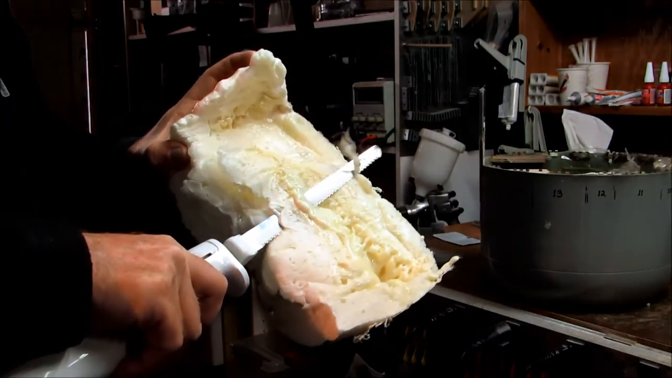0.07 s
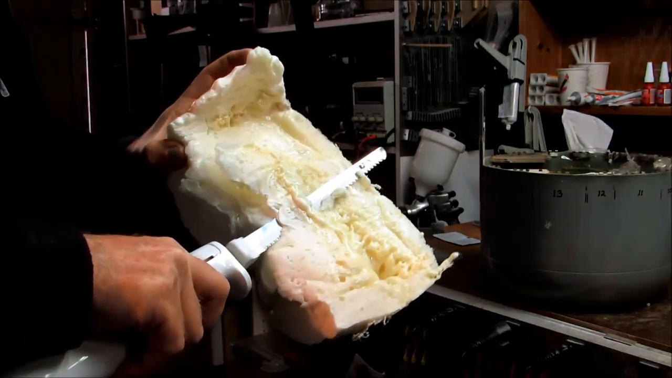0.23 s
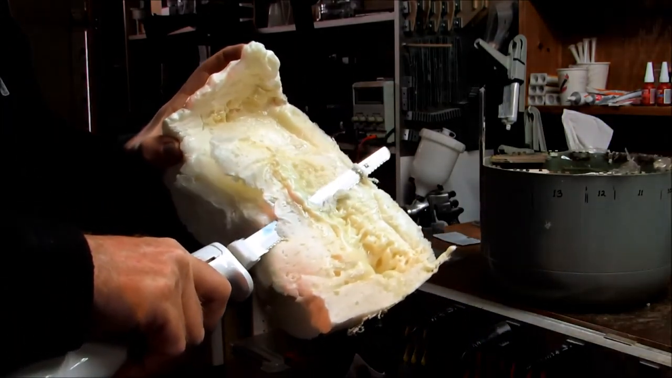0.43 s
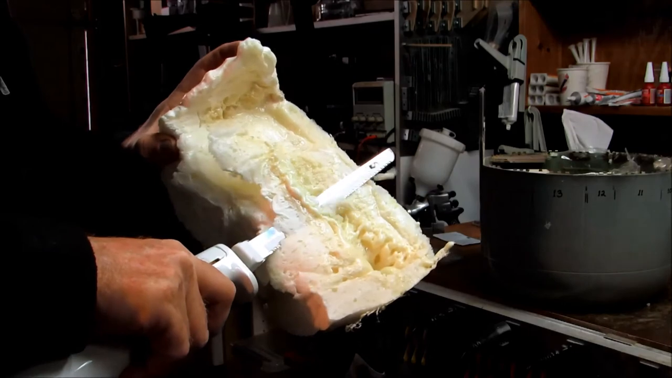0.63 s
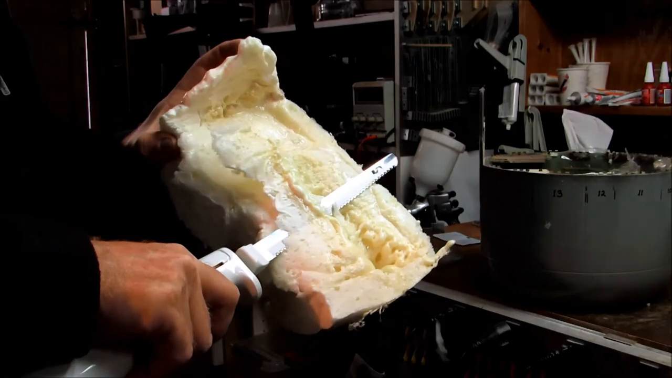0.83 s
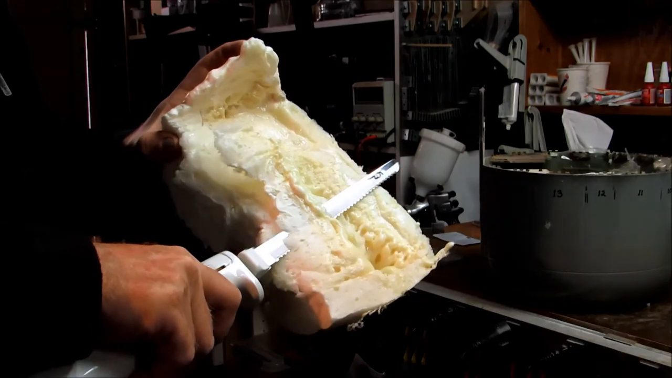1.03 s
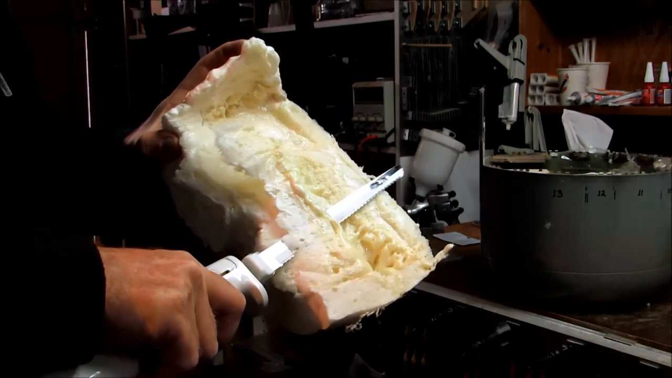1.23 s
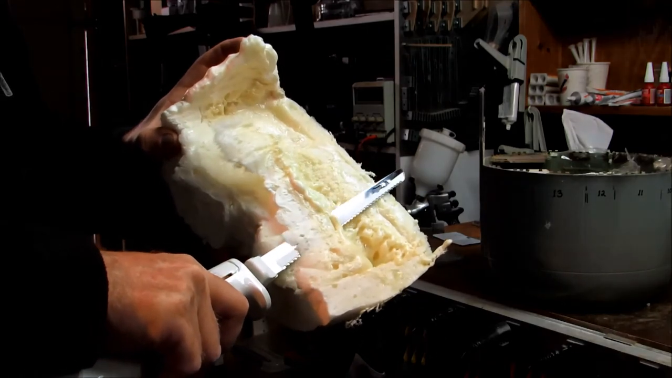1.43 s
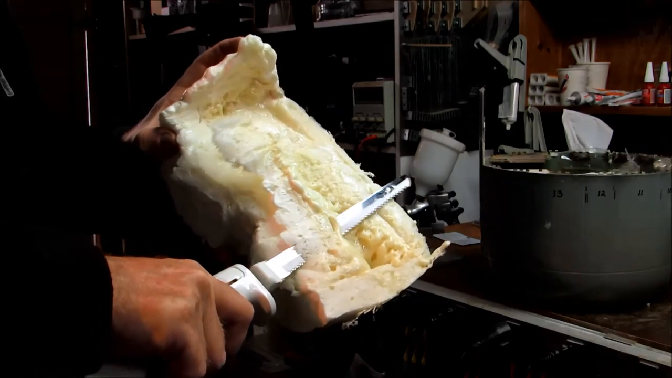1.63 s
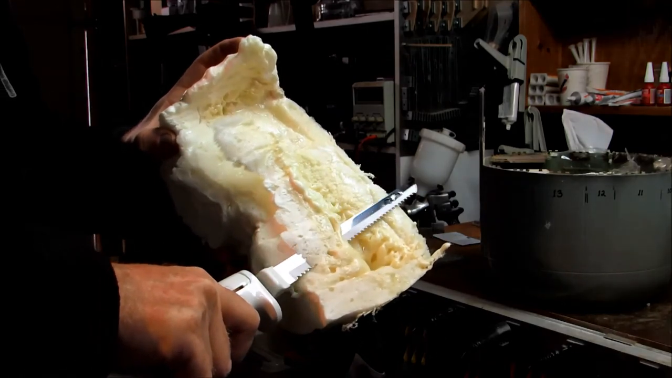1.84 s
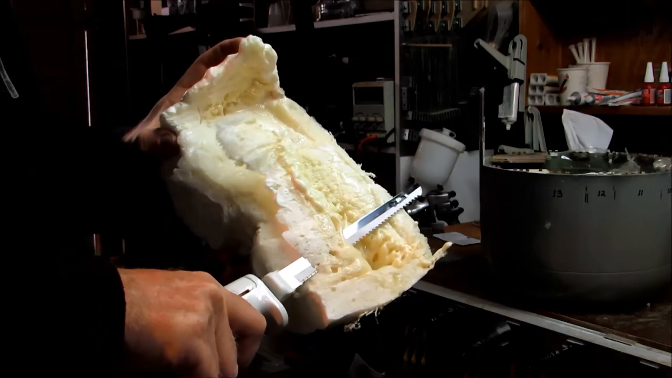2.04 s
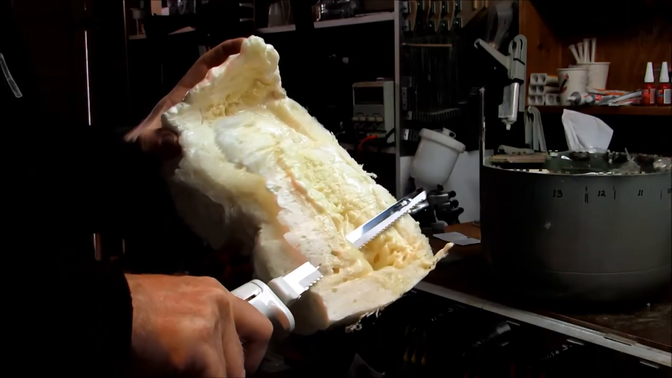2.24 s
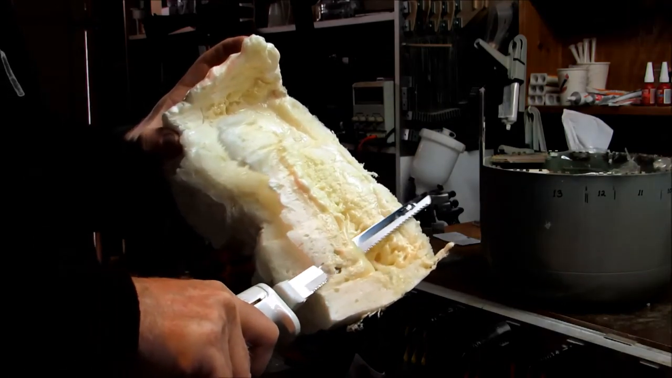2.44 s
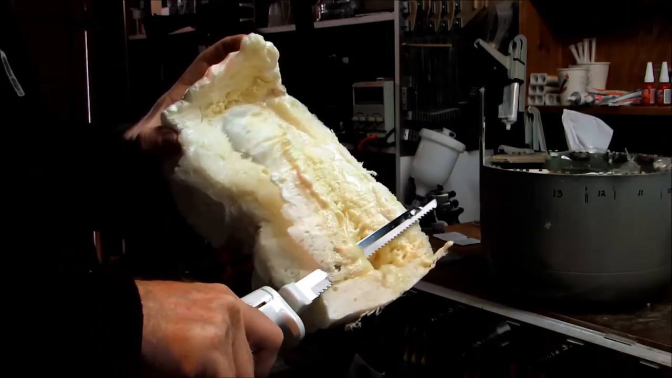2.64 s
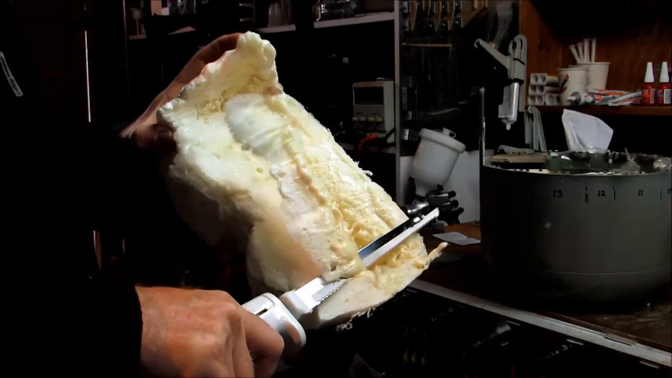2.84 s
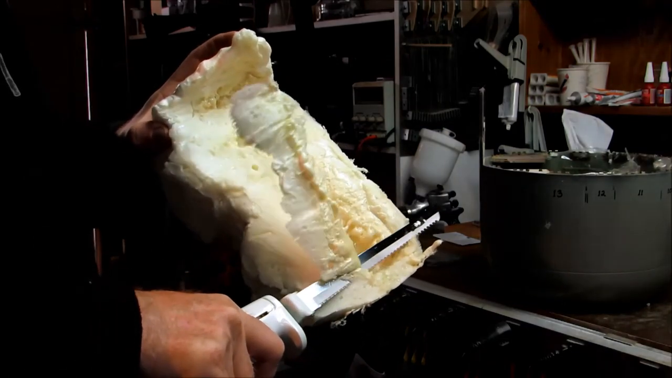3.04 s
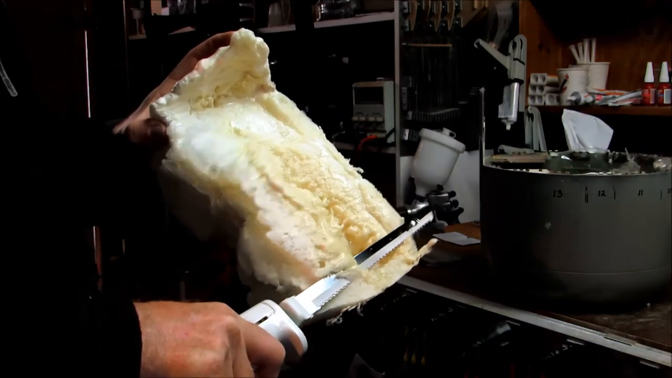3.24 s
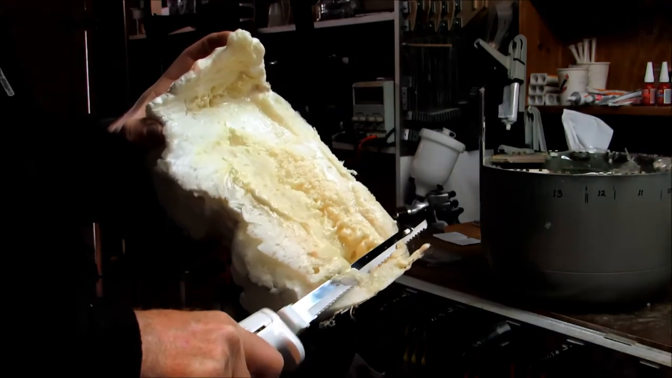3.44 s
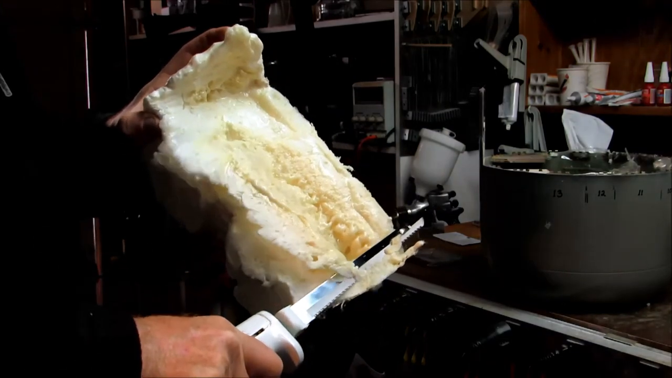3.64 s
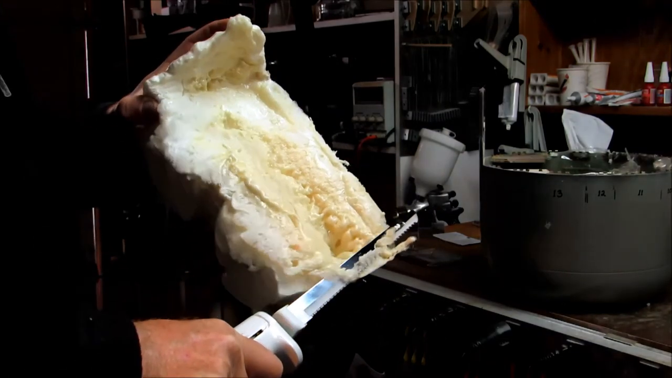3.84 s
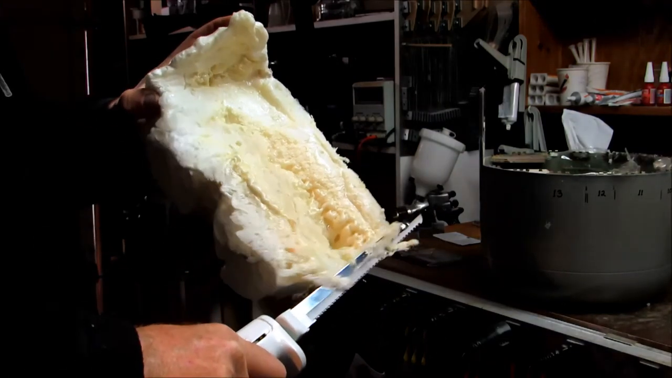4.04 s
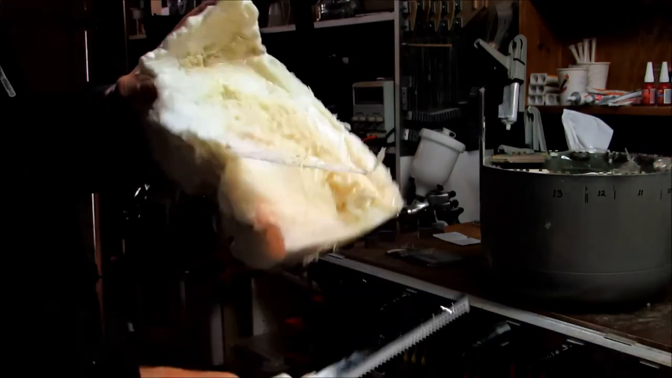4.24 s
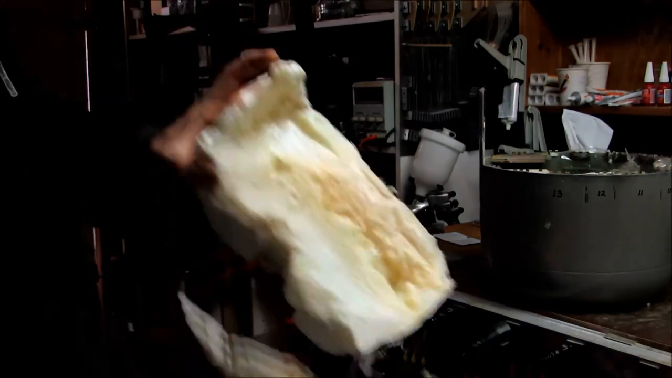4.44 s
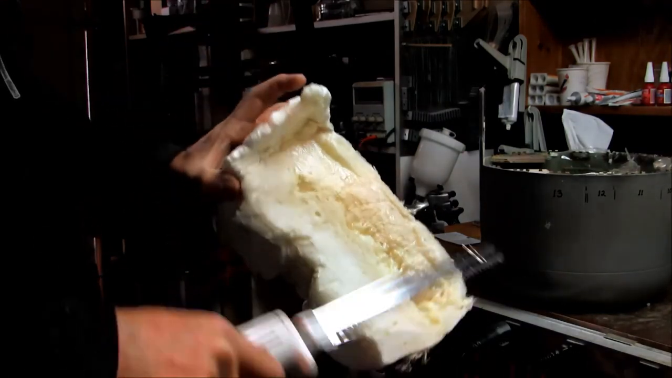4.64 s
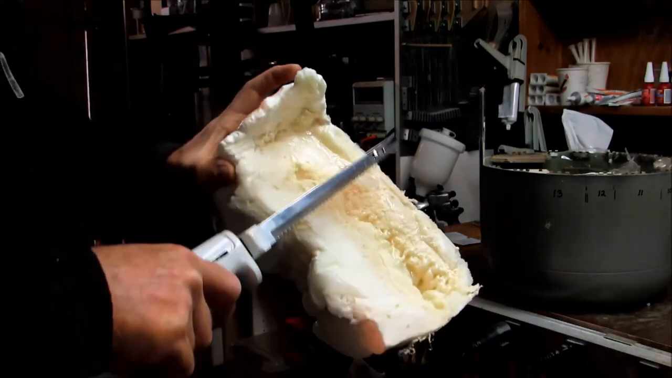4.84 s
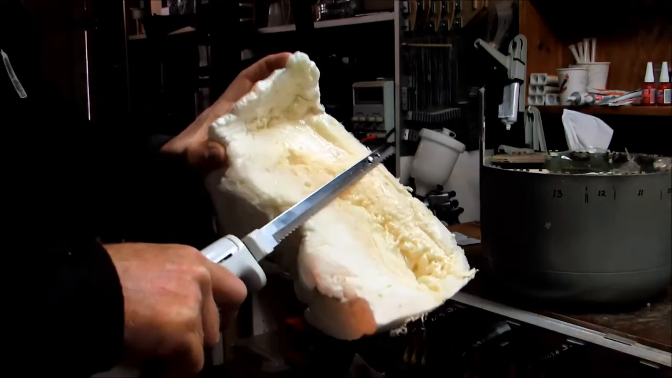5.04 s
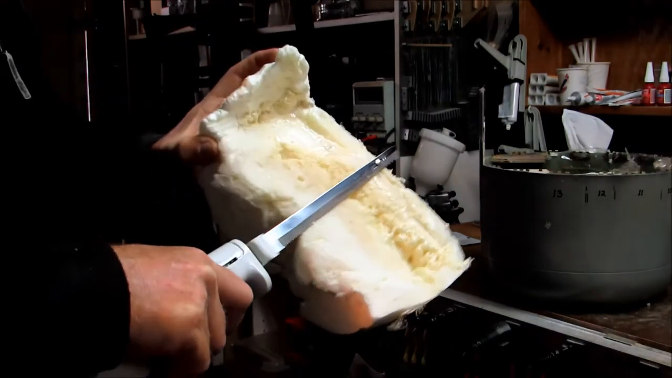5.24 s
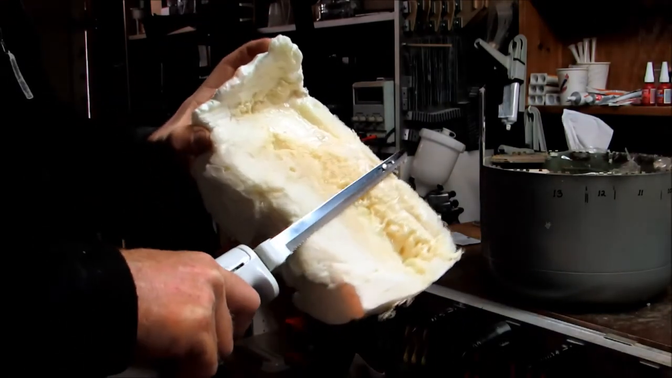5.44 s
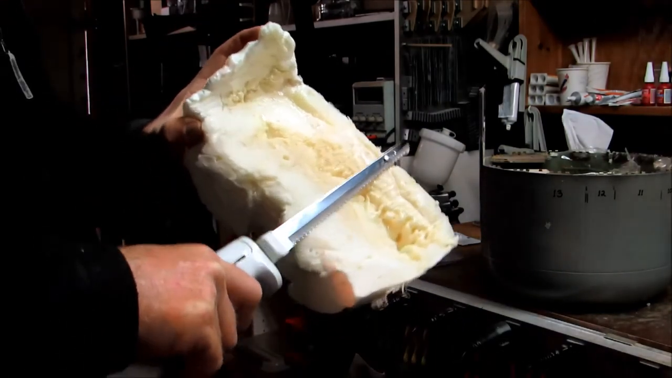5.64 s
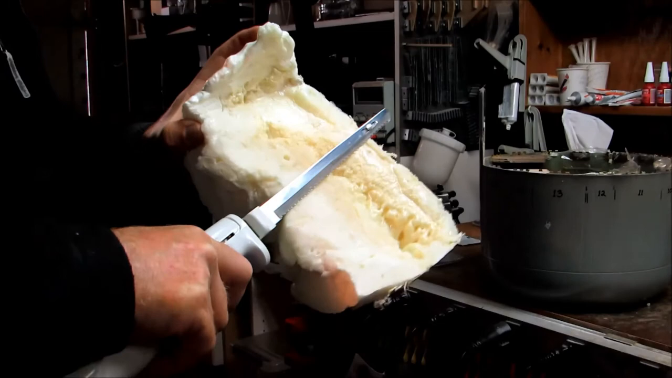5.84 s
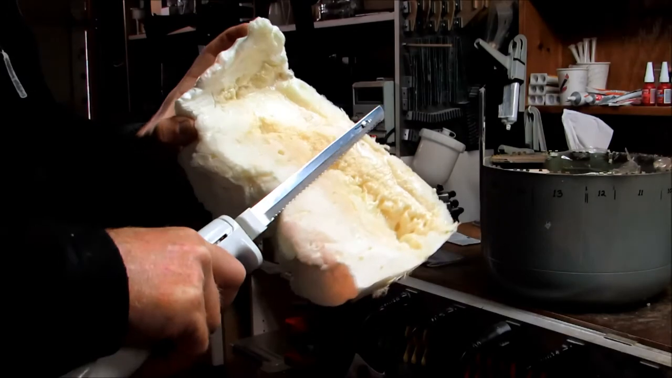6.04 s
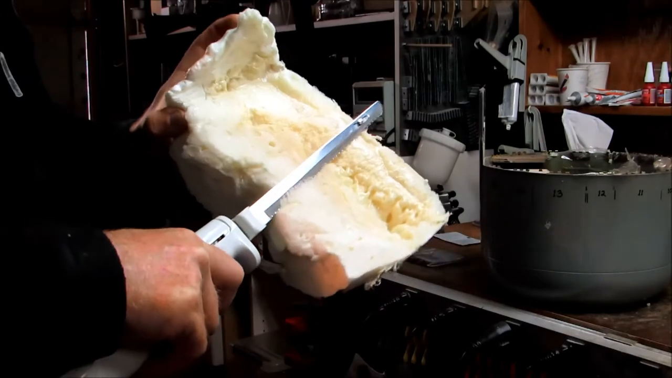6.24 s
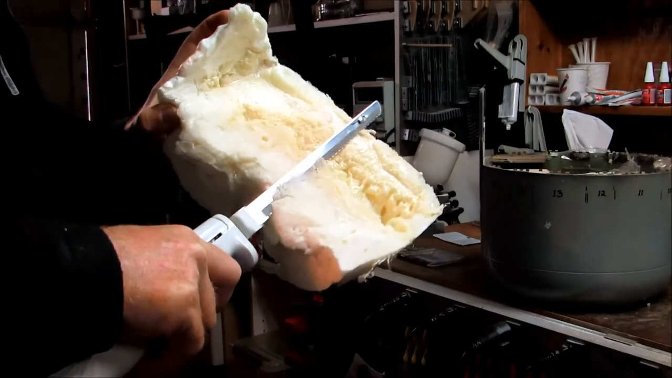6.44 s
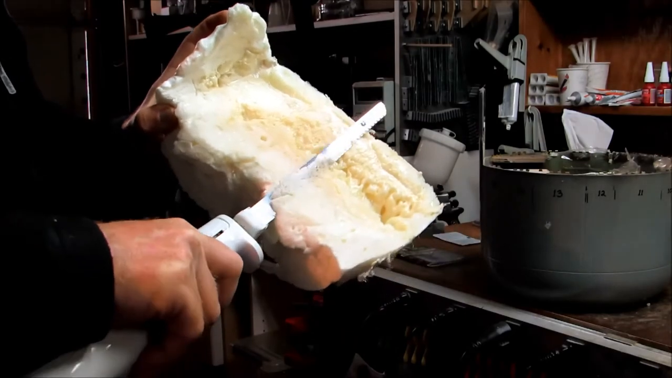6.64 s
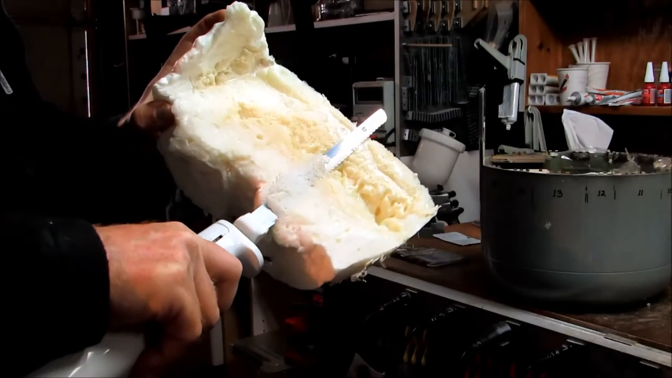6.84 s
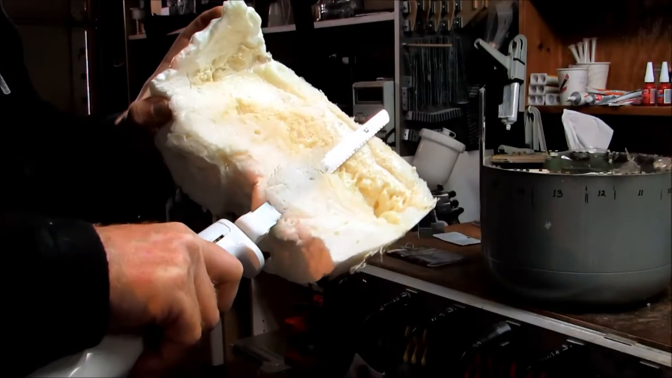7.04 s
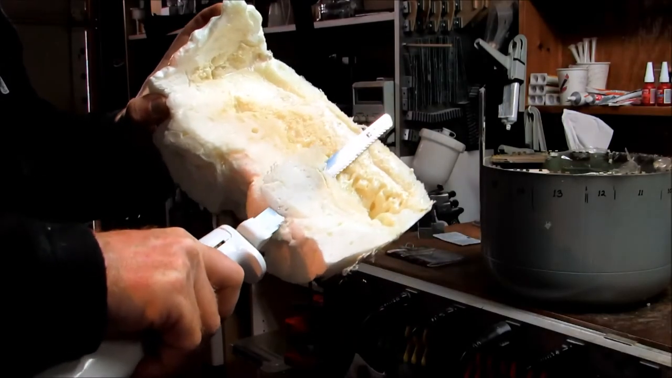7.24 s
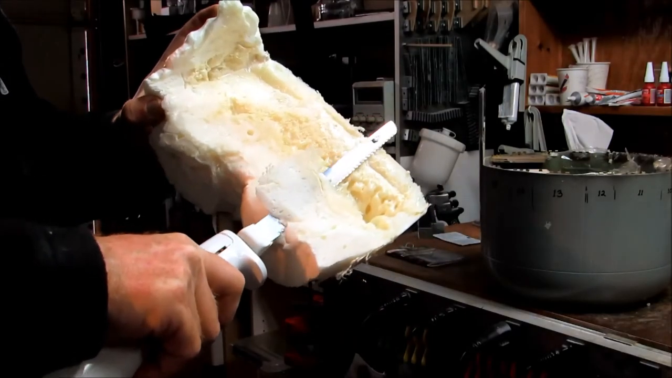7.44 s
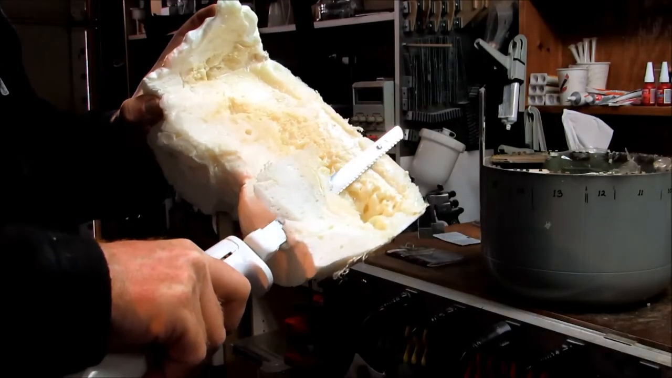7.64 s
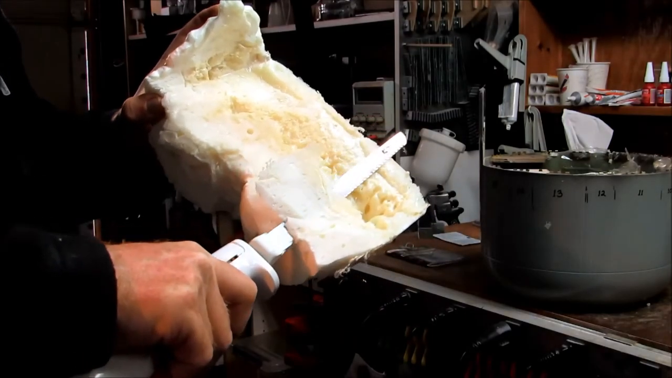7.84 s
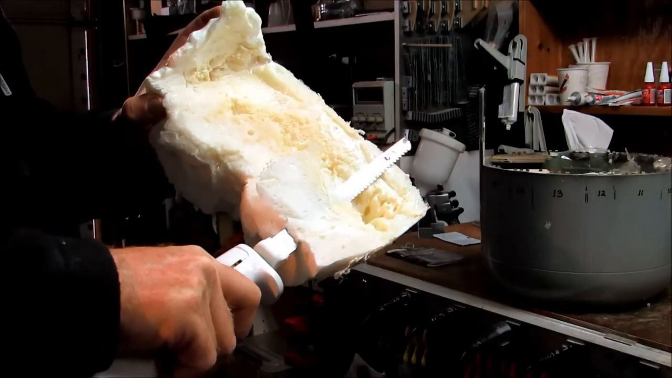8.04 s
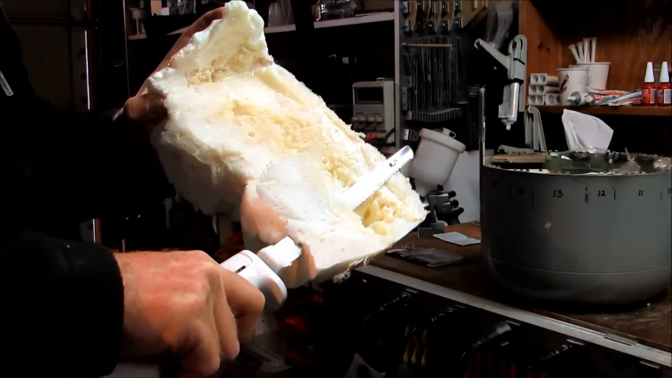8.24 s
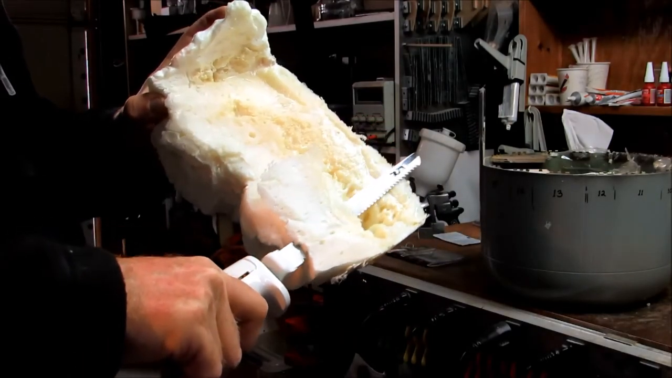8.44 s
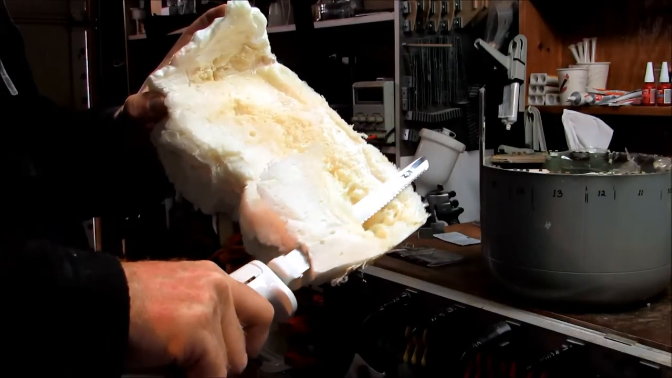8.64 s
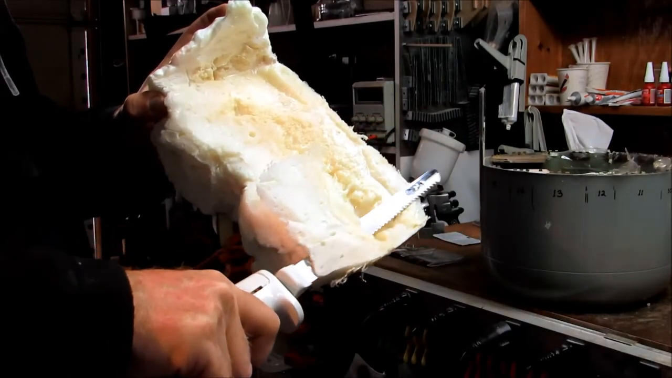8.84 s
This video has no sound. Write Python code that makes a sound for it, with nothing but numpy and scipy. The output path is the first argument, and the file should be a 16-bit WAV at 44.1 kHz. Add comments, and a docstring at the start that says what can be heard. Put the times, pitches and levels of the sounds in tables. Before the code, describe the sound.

An electric carving knife is sawing through a foam block from the start, heard close with a short workshop echo. Its high motor whine rides over a fast, repeating gear clatter, a rapidly pulsing hiss from the blades and a soft low shudder in the block. Near 0.7 seconds it slows briefly, with separate bites and a knock, then regains speed. The pitch rises a little around 3 seconds. At 4.2 seconds the power cuts and the motor coasts down with a falling whine and rattle. A few light knocks come between 4.7 and 5 seconds, and the still blade briefly scuffs the foam. At 5.1 seconds the knife spins up again, dips at 5.7 and recovers by about 6 seconds. It then saws steadily until the end, around 9 seconds, its pitch sagging slightly under the load.

```python
"""An electric carving knife saws through a foam block in a workshop. From the start its motor whines, its worm
gear clatters the same pattern on every crank turn, and its twin blades hiss on each stroke. Near 0.7 s it slows
briefly, with single bites, and the motor kicks back in with a knock. At 4.2 s the trigger is let go and the
motor coasts to a stop; the block knocks and the still blade scuffs the foam. At 5.1 s the knife restarts, slows
briefly again at 5.7 s, then cuts on to the end."""
import sys
import numpy as np
from scipy import signal
from scipy.fft import rfft, irfft, next_fast_len
from scipy.io import wavfile
from scipy.ndimage import uniform_filter1d

SR = 44100
rng = np.random.default_rng(int(sys.argv[2]) if len(sys.argv) > 2 else 0)


def wav_out(sig):
    """Save sig, one row per channel (or a flat mono array), as 16-bit PCM at SR to the path in sys.argv[1]."""
    wavfile.write(sys.argv[1], SR, np.round(np.clip(np.atleast_2d(sig).T, -1, 1) * 32767).astype(np.int16))


N = 392490

GEAR_RATIO = 11   # turns of the rotor (the motor's spinning part) for one turn of the crank
COAST_S, SWITCH_S = 1.2, .02   # how slowly the rotor loses speed; how long the power takes to switch
AUDIBLE_FROM, AUDIBLE_SPAN = 36, 42   # the knife fades in over these rotor turns per s
MAINS_BUZZ_HZ, BUZZ_DEPTH = 119.8, 0.59
SECOND_DB, SECOND_SHARE, SECOND_AT_THUMP_DB = -32.5, 0.63, -35   # the 2x tone follows the thump's level
THIRD_HZ, THIRD_WIDTH_HZ, THIRD_OVER_RATTLE_DB = 973, 250, -0.5   # the housing rings with the 3x tone
DAMPED_FROM_DB, DAMPING = -39, .8   # a blade deep in foam (thump above this level) damps the 3x tone
FOURTH_THROB_DB = 7   # swing of the 4x tone on each crank turn
SQUEAK_MULTIPLE, SQUEAK_DB, SQUEAK_FULL_AT = 24, -28.5, 800   # strongest from 800 turns per s per s
WHINE_WAVER_PER_S, RATTLE_WAVER_PER_S, RATTLE_WAVER_DB = 14, 7.8, 1.5
CLATTER_DB, RATTLE_TRIM_DB = -22, -3
FIZZ_FROM_HZ = 8400   # the foam's fizz lies above, the blades' rasp below
BITE_RISE_S, NOISE_PEAK_DB = 0.0057, 10.5   # bites and scuffs allow this much for peaks over the average
ECHO_FADE_S, ECHO_DB = 0.27, -5.5   # a fade time is the time to drop by 60 dB
HUM_HZ, HUM_WIDTH_HZ, HUM_DB = 557, 29.7, -59
ROOM_HISS_DB, RUMBLE_DB, CUTOFF_HZ = -48.5, -73, 15150

# Pauses of the trigger: (let go [s], pressed again [s], braking [turns/s per s], spin-up time [s])
TRIGGER_PAUSES = [(.665, .91, 470, .12), (4.168, 5.068, 280, .128), (5.68, 5.9, 300, .12)]
# The rotor's full speed under the load of the moment: (time [s], speed [turns/s])
FULL_SPEED = [(0, 274), (.35, 275.2), (.62, 282.5), (1.1, 283), (1.3, 278), (1.55, 279.4), (1.85, 277.2),
              (2.5, 277.8), (2.76, 280.3), (3.03, 297.5), (3.22, 308.5), (3.47, 304.3), (3.65, 298.7),
              (3.87, 300.4), (4.06, 309.7), (4.16, 318), (5.3, 318), (5.5, 315), (5.67, 321), (5.95, 303),
              (6.28, 302.5), (6.62, 293.2), (7.03, 296), (7.15, 298), (7.57, 296.2), (7.93, 291),
              (8.2, 286.4), (8.56, 285), (8.76, 285.3), (8.9, 288.6)]
# The cut at full speed: (time [s], block thump [dB], housing rattle [dB], blade rasp [dB], foam fizz [dB])
CUT_LEVELS = [(0, -32.5, -26, -26, -25), (.25, -36.5, -29.5, -29.5, -25), (.7, -32, -28, -28, -24),
              (1.1, -30, -38, -25.5, -23.5), (1.3, -33, -28, -26, -24.5), (1.8, -32, -28, -28, -24.5),
              (2.15, -33, -28, -28.5, -27.5), (2.55, -32.5, -35, -27, -27.5), (2.81, -34, -31, -28, -32),
              (3.1, -33, -24, -28.5, -33), (3.25, -34, -23.5, -30, -31), (3.38, -36.5, -35, -31, -29.5),
              (3.5, -33.5, -28.5, -27, -29), (3.62, -40.5, -29.5, -28, -28), (3.92, -35, -32.5, -28, -28),
              (4.02, -37, -29, -31, -32), (4.16, -46, -28.5, -30, -35), (4.3, -44, -18.5, -36, -40),
              (4.5, -58, -17.5, -33.5, -42), (4.63, -53, -23.5, -34, -36), (5.15, -40, -19, -27, -29),
              (5.32, -43, -26.5, -29.5, -32), (5.47, -42, -25, -29, -29), (5.67, -41, -26, -27.5, -28.5),
              (5.95, -44, -24.5, -32.5, -32), (6.1, -36.5, -22, -26, -29.5), (6.25, -33.5, -24, -25.5, -25),
              (6.43, -32, -25.5, -27.5, -24), (6.61, -36.5, -29.5, -31, -27), (6.75, -34, -26, -32, -23.5),
              (7.26, -35, -28, -31.5, -24), (7.9, -34, -29, -29, -24.5), (8.18, -35, -36, -28, -27),
              (8.33, -35.5, -32, -27, -28), (8.55, -33, -31, -26, -25), (8.76, -37, -37, -26.5, -26),
              (8.9, -42, -34, -27.5, -26)]
# Level lost below full speed; the rows are thump, rattle, clatter, rasp, fizz and whine:
# (loss with power on [dB/octave], loss with power off [dB/octave], extra loss on letting go [dB])
SLOWING_LOSSES = [(18, 12, 4.5), (6, 6.5, 1.5), (5.5, 14, 0), (11.5, 7, 1.5), (9.5, 12.5, -0.5),
                  (4.5, 6.5, 1.2)]
# Tones at multiples of the rotor speed, before the handle shapes them:
# (time [s], 4x level [dB], 8x level [dB], 16x level [dB])
WHINE_LEVELS = [(0, -32, -26.5, -32), (.42, -32.5, -28, -36), (.62, -40, -30.5, -33), (1.0, -33, -31, -32),
                (1.15, -29.5, -26.5, -33), (1.5, -36, -29, -34), (1.9, -36.5, -31.5, -32),
                (2.45, -39, -28.5, -31), (2.75, -39, -23.5, -42), (3.15, -25, -29.5, -33),
                (3.45, -36, -28, -37), (3.9, -33.5, -26.5, -33), (4.08, -26.5, -34, -32.5),
                (4.36, -26, -26, -35), (4.5, -42, -30, -35), (5.2, -35, -23, -30), (5.3, -28, -25, -32),
                (5.66, -28.5, -29, -30), (6.0, -30.5, -26, -38), (6.25, -29, -25.5, -34),
                (6.65, -31, -28.5, -34), (7.1, -29.5, -28.5, -31), (7.5, -32, -28.5, -29.5),
                (7.85, -29, -27.5, -39), (8.15, -39, -23.5, -36), (8.56, -39, -32, -35),
                (8.9, -41, -22, -33)]
# How far each tone's level wanders: (2x [dB], 4x [dB], 8x [dB], 16x [dB])
WHINE_WAVER = [0.99, 0.87, 0.82, 3.5]
# How well the handle gives off a tone: (frequency [Hz], gain [dB])
HANDLE_RESPONSE = [(130, -45), (300, -21), (480, -10), (540, 0.5), (620, -6.5), (750, -7), (900, -3),
                   (1040, 7.5), (1130, -0.5), (1230, -1), (1400, 0), (1700, -12), (2050, 1.5), (2550, -0.5),
                   (2950, -23), (3480, -1), (4100, -17), (4800, -6.5)]
# The tone of the motor's sliding contacts is heard as it crosses these:
# (frequency [Hz], width [Hz], gain [dB])
SQUEAK_RESONANCES = [(2260, 320, -11), (3500, 160, -2), (5570, 220, 1), (6450, 600, -17), (7360, 410, 6.5)]
# Tones of the unbalanced, free-wheeling rotor: (multiple of rotor speed [x], level [dB])
UNBALANCE_TONES = [(1, -24), (5, -31), (6, -32), (7, -36)]
# Tone colour of the gear clatter: (frequency [Hz], gain [dB])
CLATTER_SPECTRUM = [(180, -22.5), (300, -10), (336, -10), (502, -6.5), (548, -8.5), (644, -1.5), (860, -1),
                    (1300, -4), (2090, 1.5), (2260, -0.5), (3970, -9), (4790, -10), (6000, -12),
                    (7800, -25), (13200, -120)]
# Tone colour of the repeating tooth contacts: (frequency [Hz], gain [dB])
TOOTH_SPECTRUM = [(1000, -8.0), (1600, -12.0), (3000, -18)]
# Where the plastic casing lifts the clatter: (frequency [Hz], width [Hz], gain [dB])
CASING_RESONANCES = [(538, 18, 6.5), (1420, 150, 6), (2310, 245, 4)]
# Where the housing rings under the crank's blows: (frequency [Hz], width [Hz], gain [dB])
HOUSING_RESONANCES = [(857, 14, 5.5), (967, 40, 0.5), (1043, 33, -1.5), (1142, 60, -3)]
# Tone colour of blades in foam: (frequency [Hz], gain [dB])
HISS_SPECTRUM = [(1470, -23.5), (2500, -12), (3500, -1.5), (3940, -15), (4610, -8.5), (7440, -8),
                 (8080, -11), (12400, -8), (13600, -10), (14900, -24)]
# Single bites of the slowed blades: (start [s], rough peak level [dB])
BLADE_BITES = [(0.7587, -21), (0.7906, -18), (0.829, -16), (0.8729, -19), (0.9343, -11.5), (0.9694, -20),
               (1.0094, -10), (5.1068, -21), (5.9165, -19)]
# Tone colour of the crank's thump in the block: (frequency [Hz], gain [dB])
THUMP_SPECTRUM = [(35, -51), (60, -30), (81, -14.5), (108, -34), (161, -7.5), (194, -9), (244, 1.5),
                  (296, -7), (338, 1), (387, -4), (442, -6), (470, -8.5), (500, -5.5), (650, -5),
                  (1100, -120)]
# Knocks: the motor kicking back in at 0.917 s, then knife and block: (time [s], ring peak [dB], pitch [Hz],
# ring fade time [s], crack level [dB])
KNOCKS = [(.917, -14.5, 1010, 0.087, -47), (4.666, -18.5, 1599, 0.044, -54),
          (4.755, -21.5, 1430, 0.037, -31), (4.968, -39, 2000, .04, -64), (5.008, -15.5, 1080, 0.027, -40)]
# The tones in one knock: (multiple of its pitch [x], gain [dB])
KNOCK_TONES = [(1, 10), (1.48, -2), (2.2, -29)]
# The still blade scuffs the foam: (time [s], peak before thinning [dB], fade time [s], thin below [Hz])
SCUFFS = [(4.9874, -11, 0.17, 2300), (5.0067, -14, 0.22, 250), (5.0214, -18, 0.26, 900),
          (5.0334, -27, 0.29, 600), (5.0594, -21, 0.35, 1500)]
# Tone colour of a scuff: (frequency [Hz], gain [dB])
SCUFF_SPECTRUM = [(180, -65), (300, -23), (586, -8), (813, -27), (1060, -10), (2000, -13), (3160, -11),
                  (4030, -19), (4520, -16.5), (14900, -25.5)]
# Stereo width of the noises: (frequency [Hz], side signal against middle signal [dB])
STEREO_WIDTH = [(60, -43), (180, 4), (540, 4), (1610, -7), (4830, -5.5), (14400, -3)]
# Tone colour of the rumble through the bench: (frequency [Hz], gain [dB])
RUMBLE_SPECTRUM = [(12, -46), (20, -13), (65, 20), (81, 18), (107, -12), (130, 0), (170, -8), (290, -120)]
# Tone colour of the room's hiss: (frequency [Hz], gain [dB])
ROOM_SPECTRUM = [(15, -30), (25, -20), (64, 4), (93, -7), (230, -3.5), (541, -4), (949, -9), (1110, -8),
                 (1660, -10), (3160, -13), (3910, -15), (12000, -22), (14900, -43)]
# Narrow gaps in the treble: (frequency [Hz], width [Hz])
TREBLE_GAPS = [(3950, 160), (7900, 110)]


def rotor(full_speed):
    """Speed [turns/s] and power [0-1]: the rotor brakes when let go and speeds up again when pressed."""
    t, speed, power = np.arange(N) / SR, full_speed.copy(), np.ones(N)
    for off_s, on_s, braking, spin_up_s in TRIGGER_PAUSES:
        off, on, drag = int(off_s * SR), int(on_s * SR), braking * COAST_S
        slowing = (speed[off] + drag) * np.exp(-(t[off:on] - off_s) / COAST_S) - drag
        speed[off:on] = np.maximum(slowing, 0)
        shortfall = full_speed[on] - speed[on - 1]
        speed[on:] = full_speed[on:] - shortfall * np.exp(-(t[on:] - on_s) / spin_up_s)
        power[off:on] = 0
    return speed, uniform_filter1d(power, size=int(SWITCH_S * SR))


def motor_whine(speed, thump_db, rattle_db, second_db, fourth_db, eighth_db, sixteenth_db):
    """Tones at multiples of the rotor speed: low ones throb with the crank, high ones with the mains."""
    turns = np.cumsum(speed) / SR
    flutter = from_db(0.37 * np.array([drift(13), drift(19)]))   # loose bearings shake the level
    wobble = 0.021 * drift(30)   # and the rotor's angle

    def tone(multiple, db):
        """One wobbling tone locked to the rotor."""
        cycles = multiple * turns + rng.random() + np.sqrt(multiple) * wobble
        return np.sqrt(2) * from_db(db) * np.sin(2 * np.pi * cycles)

    crank_angle = 2 * np.pi * turns / GEAR_RATIO
    second = (1 + 0.16 * np.sin(crank_angle)) * tone(2, second_db)
    fourth = unit_level(from_db(FOURTH_THROB_DB * np.cos(crank_angle))) * tone(4, fourth_db)
    pulsing = from_db(6.7 * np.sin(crank_angle) + 1.7 * np.sin(2 * crank_angle) + 2.2 * drift(22))
    third_db = rattle_db + THIRD_OVER_RATTLE_DB - DAMPING * np.maximum(thump_db - DAMPED_FROM_DB, 0)
    third = steep_resonance(pulsing * tone(3, third_db), THIRD_HZ, THIRD_WIDTH_HZ)
    acceleration = uniform_filter1d(np.gradient(speed) * SR, size=1500)
    # The sliding contacts squeak while the motor draws current to speed up.
    sparking = np.clip(acceleration / SQUEAK_FULL_AT, .1, 1) * from_db(3.8 * drift(70))
    squeak = resonances(sparking * tone(SQUEAK_MULTIPLE, SQUEAK_DB), SQUEAK_RESONANCES)
    # The tones of the rotor's slots fade while it slows.
    slots = np.clip(1 + acceleration / 400, .1, 1) * (tone(8, eighth_db) + tone(16, sixteenth_db))
    buzz = 1 + BUZZ_DEPTH * np.sin(2 * np.pi * MAINS_BUZZ_HZ * np.arange(N) / SR)
    return flutter[0] * (second + third + fourth) + flutter[1] * buzz * (slots + squeak)


def whine_levels(speed, thump_db, loss_db):
    """Wandering levels [dB] of the 2x, 4x, 8x and 16x tones; the foam carries the 2x tone."""
    second_db = SECOND_DB + SECOND_SHARE * (thump_db - SECOND_AT_THUMP_DB)
    levels = second_db, *curves(WHINE_LEVELS)
    return [db - loss_db + handle_db(multiple * speed) + waver_db * drift(WHINE_WAVER_PER_S)
            for multiple, db, waver_db in zip((2, 4, 8, 16), levels, WHINE_WAVER)]


def handle_db(hz):
    """The handle gives off some pitches better than others."""
    return np.interp(hz, *np.transpose(HANDLE_RESPONSE))


def coasting_tones(speed):
    """The unbalanced rotor's tones slide down through the handle's resonances as it slows."""
    turns = np.cumsum(speed) / SR
    tones = np.zeros(N)
    for multiple, db in UNBALANCE_TONES:
        gain = from_db(db + handle_db(multiple * speed) + 2.9 * drift(25))
        tones += gain * np.sin(2 * np.pi * (multiple * turns + rng.random()))
    return tones


def gearbox(crank, rattle_db, clatter_db):
    """Gear teeth clatter, loose parts swell on each stroke, and each reversal knocks the housing."""
    swell = from_db(0.94 * np.cos(4 * np.pi * crank) + 0.42 * drift(15))
    teeth = colour(crank_pattern(crank, harmonics=90, change_per_s=0.75), TOOTH_SPECTRUM)
    clatter = casing(colour(0.55 * teeth + swell * rng.standard_normal(N), CLATTER_SPECTRUM))
    out_stroke, back_stroke = [np.diff(np.floor(crank + shift), prepend=0) for shift in (0, .43)]
    blows = unit_level((out_stroke + 0.47 * back_stroke) * from_db(1.4 * drift(11)))
    shaking = blows + 0.84 * teeth + .5 * rng.standard_normal(N)
    rattle = resonance(resonances(shaking, HOUSING_RESONANCES), hz=873, width_hz=440)
    return from_db(rattle_db + RATTLE_TRIM_DB) * unit_level(rattle) + from_db(clatter_db) * unit_level(clatter)


def crank_pattern(crank, harmonics, change_per_s):
    """The same tooth contacts come round on every crank turn, slowly blending between two shapes."""
    size = 2048
    bins = np.arange(size // 2 + 1)
    shapes = irfft(np.exp(2j * np.pi * rng.random((2, len(bins)))) * (bins < harmonics), size)
    first, second = [np.interp(crank % 1 * size, np.arange(size), shape, period=size) for shape in shapes]
    blend = 0.62 * drift(change_per_s)
    return unit_level(np.cos(blend) * first + np.sin(blend) * second)


def casing(x):
    """The plastic handle lifts whatever lies on its resonances."""
    return x + sum((from_db(db) - 1) * resonance(x, hz, width) for hz, width, db in CASING_RESONANCES)


def blades(crank, rasp_db, fizz_db):
    """Two strokes per crank turn: the hiss jumps as the teeth bite, then fades until they turn back."""
    stroke = (2 * crank + 0.041 * drift(13)) % 1
    bite = np.minimum(stroke / 0.3, 1) * np.exp(-1.2 * stroke) + 0.29
    uneven = from_db(np.cos(2 * np.pi * crank) + 0.2 * drift(21) + drift(5.9))
    torn_cells = rng.random(N) < 200 / SR   # about 200 foam cells tear each second
    tears = torn_cells * from_db(-36 + 2 * np.minimum(rng.exponential(1, N), 4))
    tears = signal.lfilter([1], [1, -.97], tears)   # each lasts under a millisecond
    hiss = stereo_noise(bite * uneven * (1 + tears), HISS_SPECTRUM)
    rasp, fizz = [signal.sosfilt(signal.butter(4, FIZZ_FROM_HZ, band, fs=SR, output="sos"), hiss)
                  for band in ("low", "high")]
    return from_db(rasp_db) * unit_level(rasp) + from_db(fizz_db) * unit_level(fizz)


def slow_bites():
    """Single strokes of the slowed blades, each a hiss that swells and fades."""
    swell = np.zeros(N)
    for start_s, db in BLADE_BITES:
        age = np.maximum(np.arange(N) / SR - start_s, 0) / BITE_RISE_S
        swell += from_db(db) * age * np.exp(1 - age)
    return swell * from_db(-NOISE_PEAK_DB) * stereo_noise(1, HISS_SPECTRUM)


def block_thump(crank, thump_db):
    """The foam block carries the crank's low shaking unevenly."""
    shaking = crank_pattern(crank, harmonics=40, change_per_s=1.7) + 1.9 * rng.standard_normal(N)
    return from_db(thump_db + 1.9 * drift(19)) * unit_level(colour(shaking, THUMP_SPECTRUM))


def knocks():
    """The motor's kick and the knocks of knife and block: each a dull, rough ring with two overtones and a
    short bright crack."""
    sound, noise = np.zeros(N), rng.standard_normal(N)
    crack = unit_level(colour(noise, HISS_SPECTRUM))
    for start_s, peak_db, hz, fade_s, crack_db in KNOCKS:
        blow = fading(start_s, 0, 0.0019) + 0.17 * fading(start_s, 0, 0.16) * noise
        ring = sum(from_db(db) * resonance(blow, k * hz, k * 5.5 / fade_s) for k, db in KNOCK_TONES)
        sound += from_db(peak_db) * ring / np.abs(ring).max() + fading(start_s, crack_db, 0.13) * crack
    return sound


def scuffs():
    """The still blade rubs the foam in short bursts; a light touch has no low notes."""
    friction = from_db(-NOISE_PEAK_DB) * stereo_noise(from_db(2 * drift(150)), SCUFF_SPECTRUM)
    sound = np.zeros((2, N))
    for start_s, db, fade_s, low_hz in SCUFFS:
        thinned = signal.lfilter(*signal.butter(2, low_hz, "high", fs=SR), friction)
        sound += fading(start_s, db, fade_s) * thinned
    return sound


def workshop_echo(x):
    """Sound bounces round the workshop: six fading echo loops for each ear."""
    size = next_fast_len(N + SR // 2)
    radians_per_sample = 2 * np.pi * np.arange(size // 2 + 1) / size
    delays = (rng.uniform(.008, .03, (2, 6)) * SR).astype(int)
    loop = lambda lag: 1 / (from_db(60 * lag / SR / ECHO_FADE_S) * np.exp(1j * radians_per_sample * lag) - 1)
    response = [sum((-1) ** k * loop(lag) for k, lag in enumerate(ear)) / 3 for ear in delays]
    return irfft(rfft(x, size) * np.array(response), size)[:, :N]


def background(running):
    """Room hiss, a faint hum, and low rumble through the bench while the motor turns."""
    hum = from_db(HUM_DB) * unit_level(steep_resonance(rng.standard_normal(N), HUM_HZ, HUM_WIDTH_HZ))
    rumble_gain = running * from_db(RUMBLE_DB + 2 * drift(2.5))
    rumble = rumble_gain * unit_level(colour(rng.standard_normal(N), RUMBLE_SPECTRUM))
    return from_db(ROOM_HISS_DB) * stereo_noise(1, ROOM_SPECTRUM) + hum + rumble


def from_db(db):
    """Turns a level in dB into a gain."""
    return 10 ** (np.asarray(db) / 20)


def unit_level(x):
    """Scales a signal to an average (rms) level of 1."""
    return x / np.sqrt(np.mean(x ** 2) + 1e-20)


def curves(table):
    """One curve over time for each value column, joining the rows with straight lines."""
    times, *columns = np.transpose(table)
    return [np.interp(np.arange(N) / SR, times, column) for column in columns]


def drift(rate):
    """A smooth random wander of about 1 either way; a higher rate wanders faster."""
    step, warm_up = 40, 2000
    pole = np.exp(-2 * np.pi * rate * step / SR)
    noise = rng.standard_normal(N // step + warm_up + 2)
    slow = signal.lfilter([1], [1, -2 * pole, pole * pole], noise)[warm_up:]
    return np.interp(np.arange(N) / step, np.arange(len(slow)), unit_level(slow))


def fading(start_s, peak_db, fade_s):
    """The loudness of a blow: a sudden rise, then a steady fade."""
    age = np.arange(N) / SR - start_s
    return from_db(peak_db - np.clip(60 * age / fade_s, 0, 200)) * np.clip(age / 0.00018, 0, 1)


def colour(x, spectrum):
    """Shapes the tone colour with a table of (frequency [Hz], gain [dB])."""
    size = next_fast_len(N)
    hz, db = np.transpose(spectrum)
    log_hz = np.log(np.arange(size // 2 + 1) * SR / size + 1)
    gain = from_db(np.interp(log_hz, np.log(hz), db))
    return irfft(rfft(x, size) * gain, size)[..., :N]


def stereo_noise(loudness, spectrum):
    """Coloured noise that follows a loudness curve; a side signal sets left and right apart."""
    middle, side = colour(loudness * rng.standard_normal((2, N)), spectrum)
    side = colour(side, STEREO_WIDTH)
    return unit_level(np.array([middle + side, middle - side]))


def resonance(x, hz, width_hz):
    """Rings at one pitch: lets it through at full strength and weakens the rest."""
    pole = np.exp(-np.pi * width_hz / SR)
    gain = (1 - pole * pole) / 2
    return signal.lfilter([gain, 0, -gain], [1, -2 * pole * np.cos(2 * np.pi * hz / SR), pole * pole], x)


def steep_resonance(x, hz, width_hz):
    """The same resonance twice, so less gets past on either side."""
    return resonance(resonance(x, hz, width_hz), hz, width_hz)


def resonances(x, table):
    """Several resonances side by side, added with alternating signs."""
    return sum((-1) ** k * from_db(db) * resonance(x, hz, width) for k, (hz, width, db) in enumerate(table))


def scene():
    """The knife in the middle and the block's thump a little to the right, in an echoing workshop."""
    full_speed, = curves(FULL_SPEED)
    thump_db, rattle_db, rasp_db, fizz_db = curves(CUT_LEVELS)
    speed, power = rotor(full_speed)
    octaves_down = np.log2(full_speed / np.maximum(speed, AUDIBLE_FROM))
    *losses, whine_loss = [power * driven * octaves_down + (1 - power) * (idle * octaves_down + step)
                           for driven, idle, step in SLOWING_LOSSES]
    whine_db = whine_levels(speed, thump_db, whine_loss)
    rattle_db = rattle_db + RATTLE_WAVER_DB * drift(RATTLE_WAVER_PER_S)
    levels = thump_db, rattle_db, CLATTER_DB, rasp_db, fizz_db
    thump_db, rattle_db, clatter_db, rasp_db, fizz_db = [db - loss for db, loss in zip(levels, losses)]
    running = np.clip((speed - AUDIBLE_FROM) / AUDIBLE_SPAN, 0, 1)
    crank = np.cumsum(speed) / SR / GEAR_RATIO   # crank turns so far
    whine = motor_whine(speed, thump_db, rattle_db, *whine_db)
    knife = running * (whine + gearbox(crank, rattle_db, clatter_db)) + knocks()
    knife += running * (1 - power) * from_db(-whine_loss) * coasting_tones(speed)
    block = running * block_thump(crank, thump_db)
    direct = knife * from_db([[-.1], [.1]]) + block * from_db([[-1.5], [1.5]])
    echo = from_db(ECHO_DB) * workshop_echo(knife + block)
    foam = running * blades(crank, rasp_db, fizz_db) + slow_bites() + scuffs()
    return direct + echo + foam + background(running)


def record(dry):
    """Cuts two narrow gaps in the treble, rounds off loud peaks and removes the very top."""
    for hz, width in TREBLE_GAPS:
        dry = dry - resonance(dry, hz, width)
    rounded = .8 * np.tanh(dry / 0.79)
    return signal.sosfilt(signal.cheby2(20, 70, CUTOFF_HZ, fs=SR, output="sos"), rounded)


dry = scene()
out = record(dry)
wav_out(out)
```